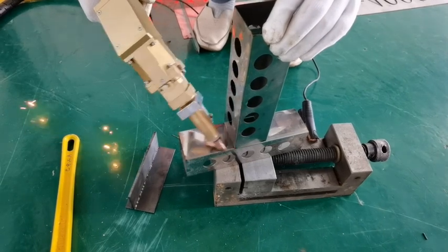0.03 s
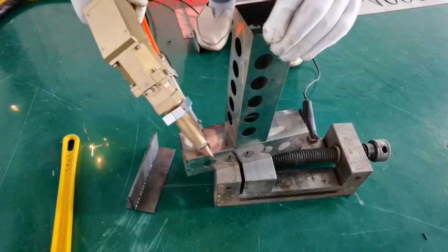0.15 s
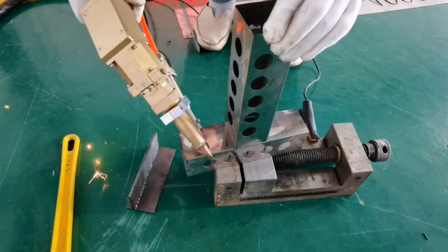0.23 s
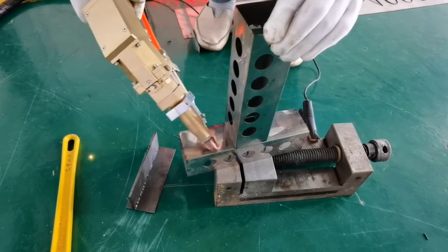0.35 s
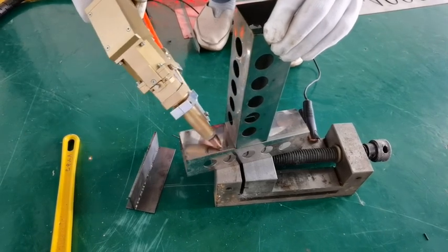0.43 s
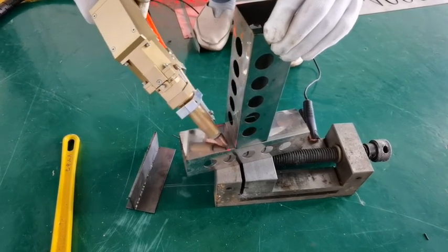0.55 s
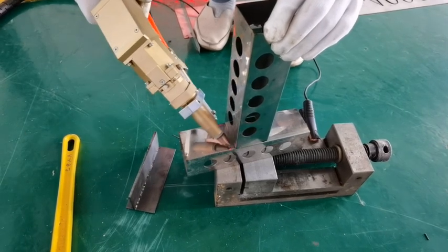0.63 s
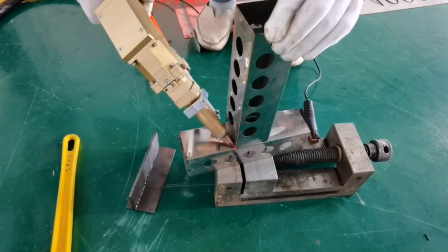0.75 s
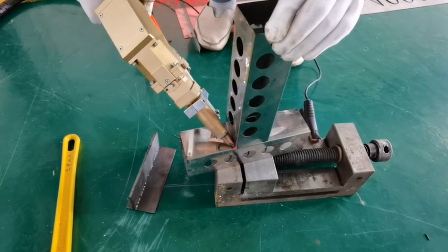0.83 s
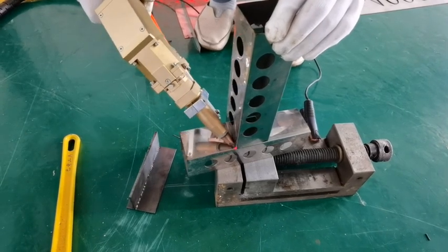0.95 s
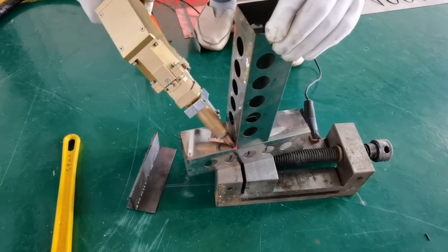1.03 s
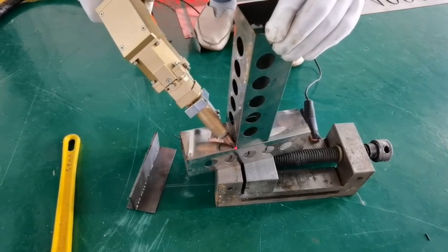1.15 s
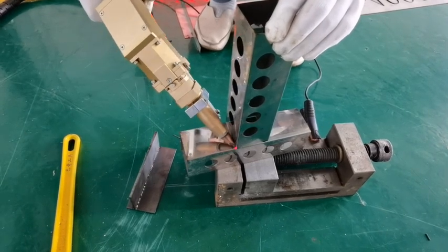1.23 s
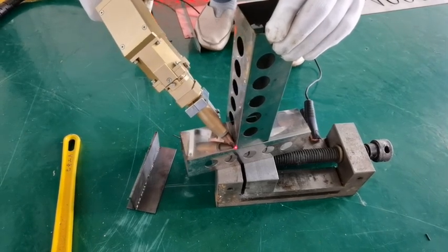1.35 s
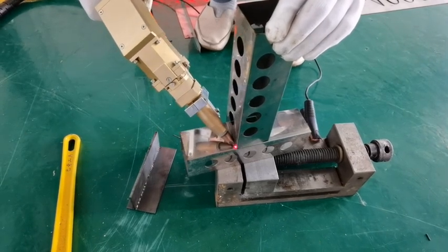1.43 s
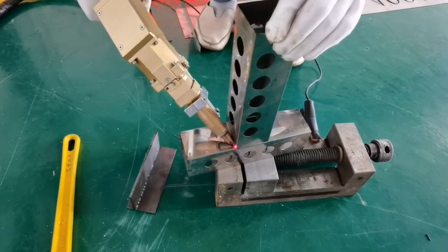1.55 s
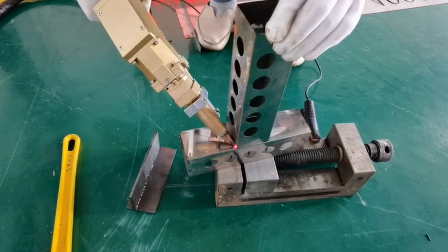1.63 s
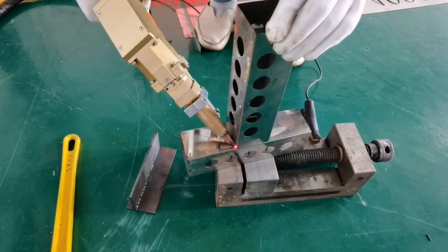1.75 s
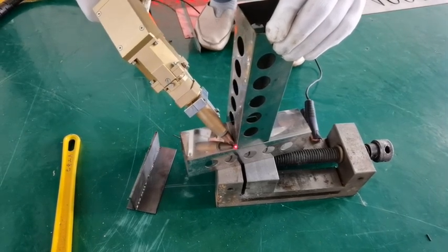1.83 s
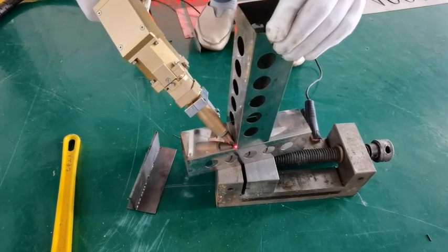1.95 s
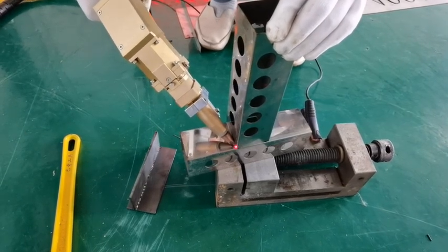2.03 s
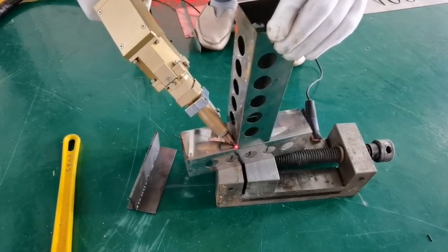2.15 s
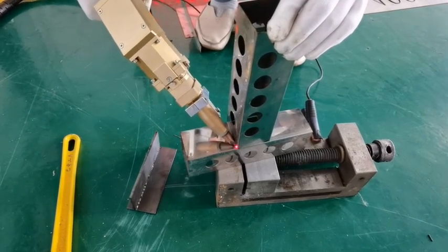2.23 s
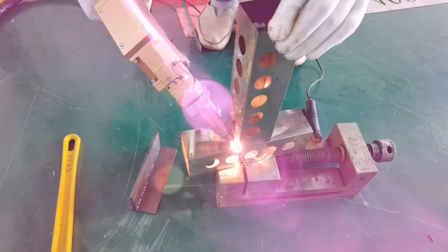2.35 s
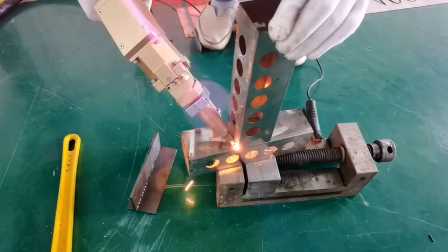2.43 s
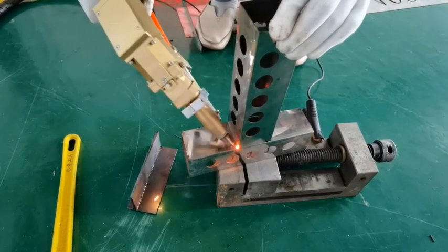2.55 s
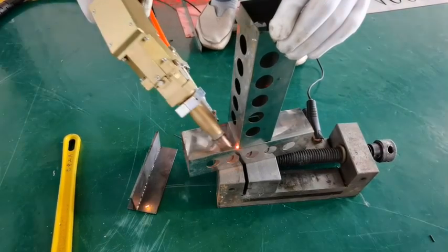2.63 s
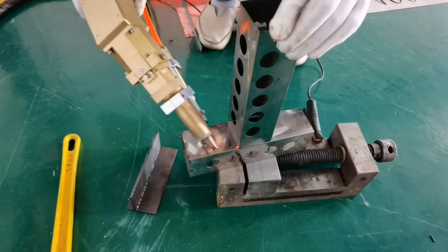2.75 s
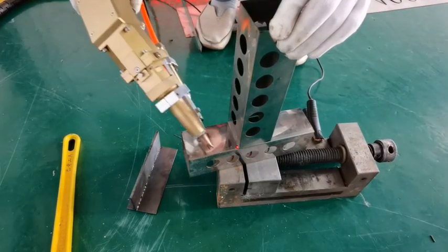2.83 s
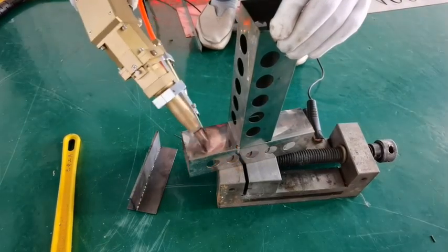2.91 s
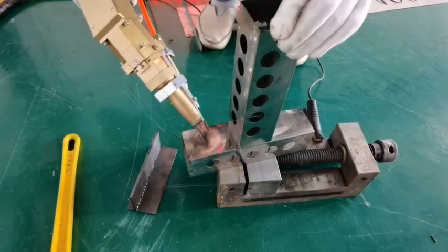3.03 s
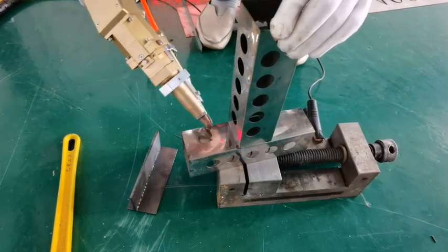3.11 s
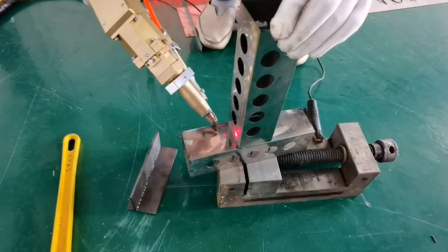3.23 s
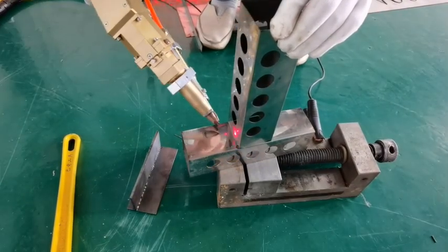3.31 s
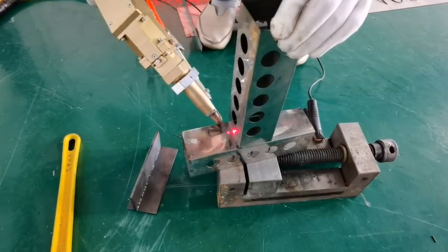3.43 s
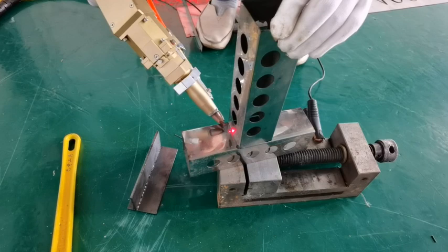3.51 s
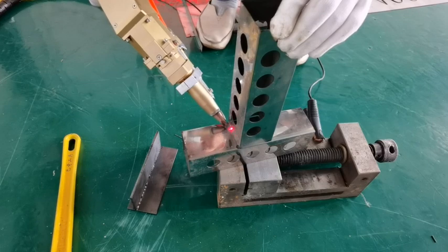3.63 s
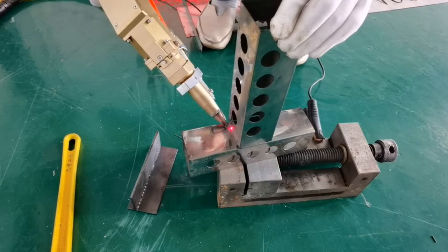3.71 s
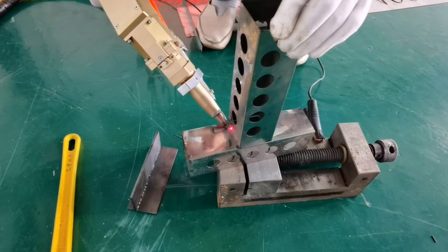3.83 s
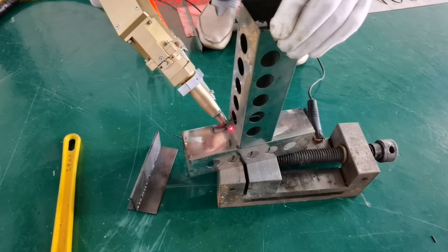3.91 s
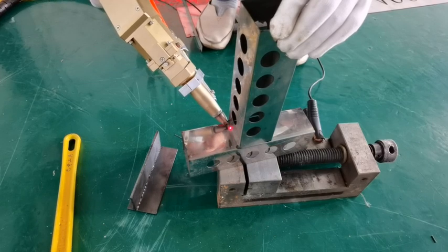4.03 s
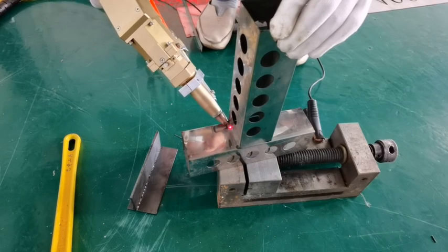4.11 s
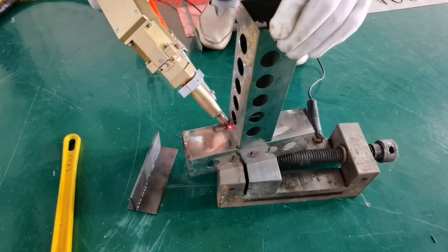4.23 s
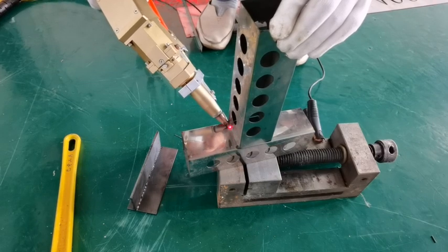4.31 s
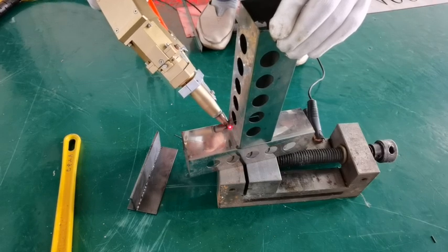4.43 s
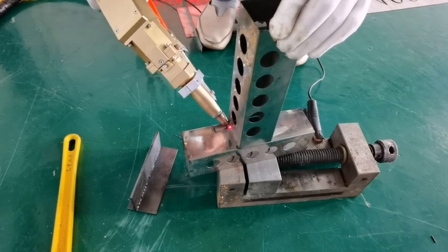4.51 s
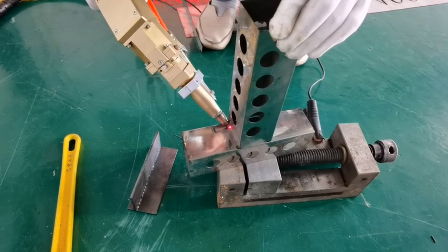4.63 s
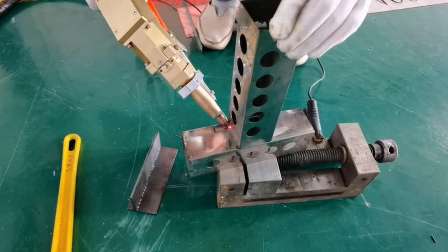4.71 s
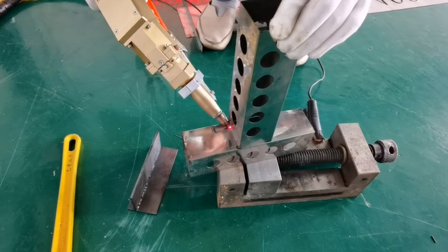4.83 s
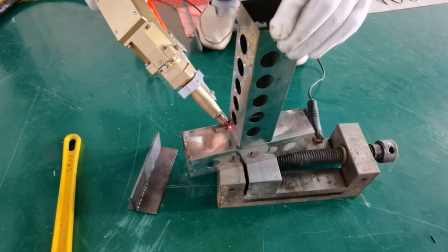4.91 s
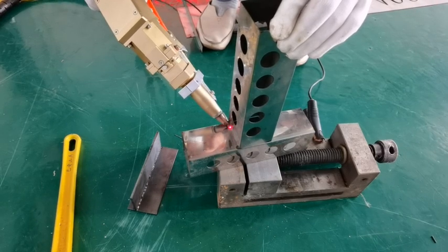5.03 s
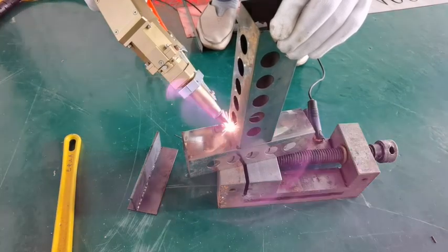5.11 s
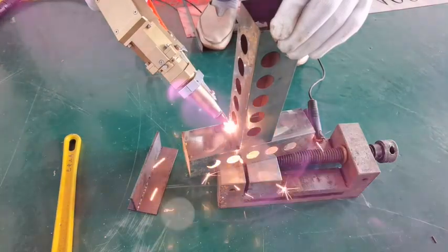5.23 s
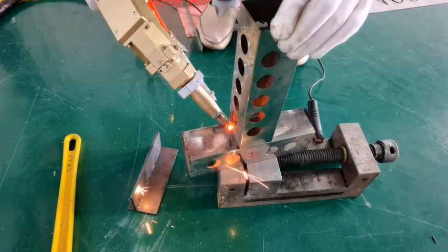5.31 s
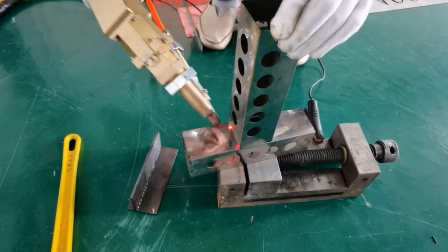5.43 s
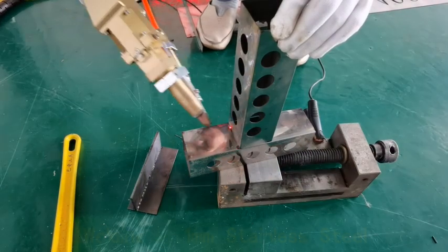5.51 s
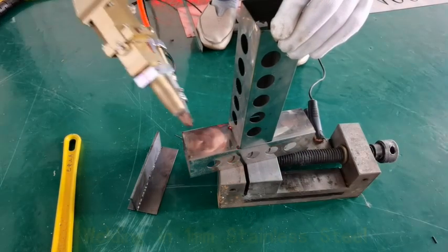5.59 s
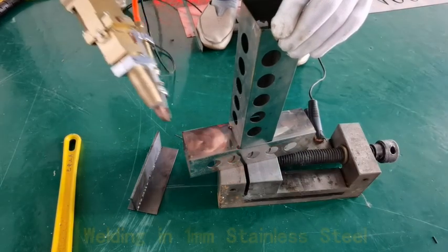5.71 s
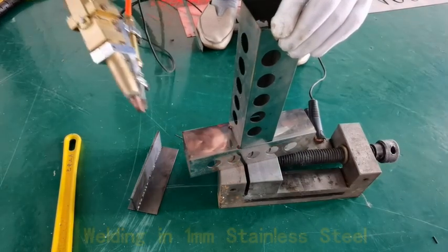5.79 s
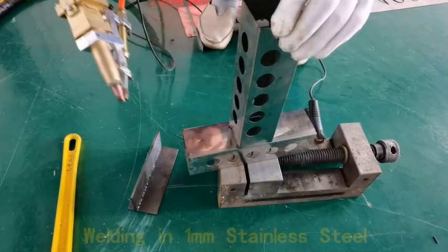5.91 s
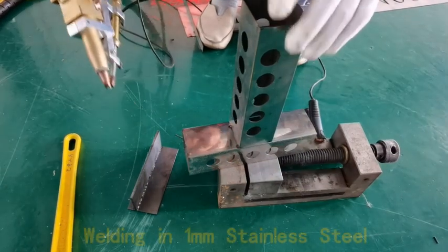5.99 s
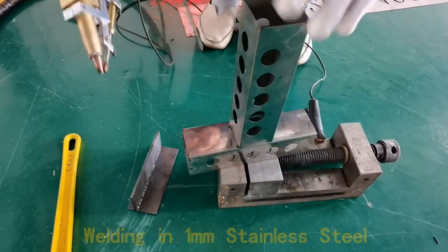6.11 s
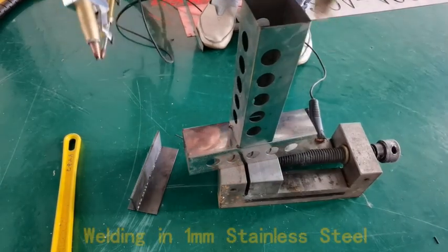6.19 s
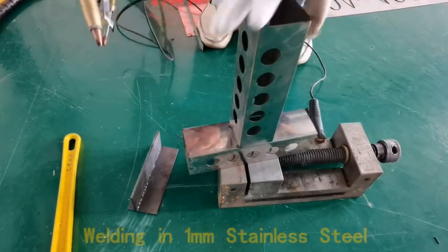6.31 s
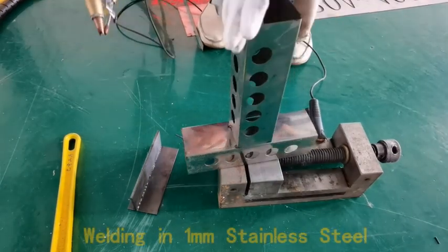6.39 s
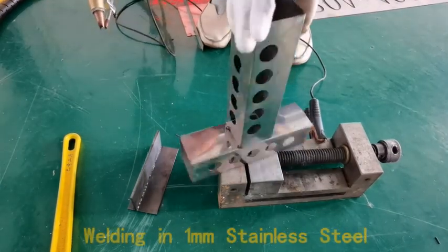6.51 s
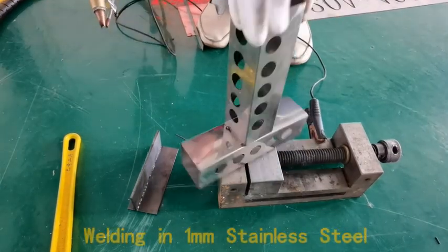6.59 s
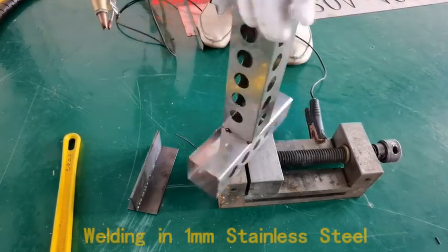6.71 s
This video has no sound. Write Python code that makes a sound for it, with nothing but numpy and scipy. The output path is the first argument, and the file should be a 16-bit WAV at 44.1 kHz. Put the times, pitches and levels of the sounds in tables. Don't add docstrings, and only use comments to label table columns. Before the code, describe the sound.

A workshop hums steadily from the start: low chiller rumble, wavering pump and fan tones, smooth bright gas hiss and a faint, very thin electronic whine. At about 2.27 seconds a gas nozzle whistles, then at 2.31 a sharp snap starts a harsh burst, buzzing about 53 times a second with crackling spits and high shrieks, stopping near 2.47. A short whistling gas tail closes by about 2.6. The room dips during the burst and stays slightly quieter. Hum and hiss continue until a second whistle around 5.14 and a similar rasping burst from 5.16 to 5.33, with a quick gas cutoff. The background is lower again. From about 6.48 to 6.75, a thin steel tube scrapes off a vice in quick stuttering rubs, with squeals near two kilohertz and hollow low rings. Close stereo microphone, little reverberation.

```python
import sys
import numpy as np
from scipy import signal
from scipy.fft import rfft, irfft, next_fast_len
from scipy.io import wavfile
from scipy.ndimage import uniform_filter1d

SR = 44100
rng = np.random.default_rng(int(sys.argv[2]) if len(sys.argv) > 2 else 0)


def store_wav(level_fs):
    pcm = np.round(np.clip(np.atleast_2d(level_fs), -1, 1) * 32767)
    wavfile.write(sys.argv[1], SR, pcm.T.astype(np.int16))


def field_ratio(decibels):
    return 10 ** (np.asarray(decibels, dtype=float) / 20)


N = 297719
BETWEEN_TACKS_S = 4


def weld():
    first, second = [port_noise(ports, ridges, echo=0.27) for ports, ridges in zip(JET_PORTS, JET_RIDGES)]
    jet = np.where(np.arange(N) / SR < BETWEEN_TACKS_S, first, second)
    puffs = vapour_puffs(jet)
    return opposed(puffs + gas_flow(first, second) + spits(jet))


# hz, likeness_0_1, left_lead_rad
JET_PORTS = [
    [(1500, .97, .25), (2250, .8, 1.1), (2600, .7, 1.9), (3100, .6, 1.6), (3400, .7, 1.9), (3750, .8, .6),
     (4250, .85, .5), (4480, .99, .05), (4800, .85, .8), (5400, .8, 1.55), (6150, .7, 2.2),
     (6750, .75, 1.45), (7800, .9, 2.8), (8400, .8, 3.8), (9050, .75, 5.1), (9850, .8, 3.8),
     (10450, .6, 4.7), (10850, .8, 3.7), (11200, .7, 5.1), (11600, .8, 3.7), (12230, .7, 5.2),
     (12600, .8, 8.3), (13300, .98, 9.4), (14200, .3, 12.0), (15000, .5, 14.1), (15700, .98, 15.7)],
    [(1900, .85, .7), (2300, .85, 1.6), (2550, .9, 2.3), (2720, .997, 3.1), (2900, .997, 3.17),
     (3080, .7, .4), (4000, .75, .8), (4400, .75, 1.5), (5600, .8, 1.7), (6350, .9, 2.6), (7050, .85, 2.3),
     (7350, .997, 3.1), (7950, .997, 3.17), (8450, .85, 5.1), (9000, .85, 5.7), (9500, .8, 5.1),
     (10150, .93, 3.5), (10800, .8, 5.0), (11500, .7, 4.8), (12050, .9, 3.5), (12700, .7, 3.8),
     (14300, .8, 3.8), (15000, .5, 5.1), (15600, .4, 4.6)],
]
# hz, width_hz, level_db
JET_RIDGES = [
    [(1960, 180, -6.5), (2760, 140, 8), (4290, 150, 5), (4760, 230, -4), (5450, 280, 0.5), (6200, 230, -10),
     (7230, 220, -5.5), (8000, 200, 2), (8300, 200, -1), (8750, 170, -2), (3340, 230, 1.5),
     (7240, 150, 1.5), (10050, 150, 0), (10400, 100, -12), (11300, 150, 3), (11700, 120, -3),
     (13200, 90, -8), (13650, 180, 5), (14830, 200, -4), (10900, 200, 2), (11700, 350, 4), (12400, 160, -1),
     (14000, 300, -3), (15500, 300, 6)],
    [(1960, 190, -13), (2500, 390, 1.5), (2820, 190, 1), (3900, 460, 3), (4300, 130, -3.5), (5470, 240, -4),
     (6400, 200, -1), (7000, 300, 3), (8160, 370, -4), (9100, 240, -1), (10250, 240, 7), (10800, 200, -4),
     (12800, 300, -4), (9800, 110, -8), (11000, 120, -5), (11450, 180, 5), (12050, 150, 3),
     (13100, 170, 11), (13400, 100, -5), (14400, 120, -4), (15000, 200, -7), (15500, 200, 1)],
]


def port_noise(ports, ridges=(), echo=0):
    size = next_fast_len(N)
    hz = np.arange(size // 2 + 1) * SR / size
    points_hz, likeness, lead_rad = np.transpose(ports)
    alike = np.clip(np.interp(hz, points_hz, likeness), 0, 1)
    lead = np.interp(hz, points_hz, lead_rad)
    shared, left, right = rfft(rng.standard_normal((3, size)))
    turn = np.exp(0.5j * lead)
    pair = np.sqrt(alike) * shared * [turn, 1 / turn] + np.sqrt(1 - alike) * np.array([left, right])
    colour = field_ratio(sum(db * np.exp(-((hz - centre) / width) ** 2) for centre, width, db in ridges))
    lags_s = rng.uniform(0.001, 0.012, size=6)
    comb = 1 + echo * sum(np.exp(-2j * np.pi * hz * lag) for lag in lags_s)
    return irfft(pair * colour * comb, size)[:, :N]


# peak_s, level_db, low_over_rest_db
SWEEPS = [
    [(2.310, -0.5, 0.5), (2.3285, 2, -3), (2.351, 1.5, -1), (2.369, 0, -3), (2.390, -2, 1),
     (2.410, -0.5, -3), (2.430, -0.5, -3), (2.447, -0.5, -4), (2.460, -2.5, -3)],
    [(5.167, 2.5, 0), (5.186, 1, -1), (5.205, 3.5, -5.5), (5.224, 1.5, -3.5), (5.243, -3, 0.5),
     (5.260, 0, -1), (5.279, -5.5, 0.5), (5.298, -3, 1.5), (5.317, -1, -1.5)],
]
# first_db, turn_db, last_db, turn_share_of_tack
NOZZLE_LAW, UPPER_LAW, LOWER_LAW = (-20, -16.5, -21.5, -1), (-25.5, -15.5, -17.5, 0.53), (-29, -16, -17.5, 1.03)
# first_s, turn_s, last_s, turn_share_of_tack
PUFF_LAW = (0.0059, 0.0099, 0.0055, 0.38)
PUFF_STRETCH = (1.12, 0.97)


def sweep_power():
    t, power = np.arange(N) / SR, np.zeros((3, N))
    for tack, stretch in zip(SWEEPS, PUFF_STRETCH):
        for k, (peak_s, level_db, low_db) in enumerate(tack):
            share = k / (len(tack) - 1)
            tilt_db = np.array([0, low_db / 2, low_db])
            depth_db = np.array([along(law, share) for law in (NOZZLE_LAW, UPPER_LAW, LOWER_LAW)])
            levels_db = level_db + tilt_db + depth_db
            near = slice(int((peak_s - 0.04) * SR), int((peak_s + 0.04) * SR))
            since_s = t[near] - peak_s
            spread_s = np.where(since_s < 0, 0.65, 1.05) * stretch * along(PUFF_LAW, share)
            power[:, near] += field_ratio(2 * levels_db)[:, None] * np.exp(-(since_s / spread_s) ** 2)
    return power


def along(law, share):
    first, turned, last, turn = law
    return np.interp(share, [0, turn, 1], [first, turned, last])


# hz, level_db_per_hz
NOZZLE = [(8800, -22), (9700, -5), (10300, -0.5), (11000, -3), (11800, -7), (12600, -1), (13100, -17),
          (13900, -11), (14600, -11), (15400, -12), (15700, -22)]
UPPER_JET = [(5300, -13), (6100, -12), (6600, 0), (7500, -3), (8000, 1), (9000, -6), (9800, -10)]
LOWER_JET = [(400, -19), (900, -25), (1200, -10), (2000, -0.5), (2600, 2), (3100, -1), (4200, 1),
             (4800, 3.5), (5600, 2.5), (6400, -8)]
BEAM_OFF_S, SNUFF_DB_PER_S = (2.4705, 5.327), 3000


def vapour_puffs(jet):
    t, power = np.arange(N) / SR, sweep_power()
    sputter = field_ratio(1.3 * drift(590.0))
    puffs = 0
    for part_power, spectrum in zip(power, (NOZZLE, UPPER_JET, LOWER_JET)):
        puffs = puffs + np.sqrt(part_power) * evened(coloured(jet, spectrum), span_s=0.003)
    off_s = np.where(t < BETWEEN_TACKS_S, *BEAM_OFF_S)
    return sputter * puffs * field_ratio(-SNUFF_DB_PER_S * np.clip(t - off_s, 0, 0.05))


# hz, width_hz, level_db
FLOW_TONES = [(9750, 300, -12), (10700, 250, -5), (11000, 300, 0), (11650, 350, -7), (12600, 300, -15),
              (13950, 450, -15), (14850, 350, -13)]
LATE_FLOW_TONES = [(9750, 270, -11), (10400, 300, -10), (10840, 300, 0), (11300, 450, -6),
                   (12500, 300, -15), (13950, 300, -11), (14800, 350, -12)]
# hz, width_hz, level_db
RUSH_TONES = [(1240, 400, 1), (1840, 730, 7.5), (2200, 130, 6), (3230, 840, 11.5), (4200, 300, 13)]
LATE_RUSH_TONES = [(1250, 330, 5.4), (1840, 440, 7.9), (2200, 130, 3), (3350, 400, 11), (4260, 400, 7)]
# peak_s, level_db, length_s
FLARES = [
    (2.295, 2, .01),
    (2.485, -2, .012),
    (2.507, 3, .005),
    (5.337, 0, .004),
    (5.36, -2, .008),
]


def gas_flow(first, second):
    whistle_db, rush_db = flow_levels()
    whistle_gain = field_ratio(whistle_db + 1.1 * drift(45.0) + bumps(FLARES))
    whistle = whistle_gain * each_tack(first, second, FLOW_TONES, LATE_FLOW_TONES)
    rush_gain = field_ratio(rush_db + 1.5 * drift(40.0))
    late_noise = np.roll(first, SR, axis=1)
    return whistle + rush_gain * each_tack(first, late_noise, RUSH_TONES, LATE_RUSH_TONES)


# open_s, shut_s, whistle_db, closing_db_per_s, bleed_under_whistle_db
VALVE = [
    (2.27, 2.543, -29, 700, -6),
    (5.144, 5.348, -28, 212, -24),
]
CLIMB_DB_PER_S, OPENING_DB_PER_S, BLEED_DB_PER_S = 20, 350, 163
# peak_s, level_db, fade_s
GUSTS = [
    (2.245, -44.5, 0.023),
    (2.295, -36.5, 0.028),
    (2.478, -42, 0.14),
    (5.10, -43, 0.038),
    (5.336, -45, .083),
]
GUST_RISE_S, RUSH_UNDER_WHISTLE_DB = 0.02, -21


def flow_levels():
    t, levels = np.arange(N) / SR, []
    for open_s, shut_s, level_db, closing, bleed_db in VALVE:
        top_db = level_db + CLIMB_DB_PER_S * (np.clip(t, open_s, shut_s) - open_s)
        levels.append(swell(open_s, shut_s, top_db, OPENING_DB_PER_S, closing))
        levels.append(swell(shut_s, shut_s, top_db + bleed_db, OPENING_DB_PER_S, BLEED_DB_PER_S))
    whistle_db = np.max(levels, axis=0)
    rush_levels = [whistle_db + RUSH_UNDER_WHISTLE_DB]
    for peak_s, level_db, fade_s in GUSTS:
        length_s = np.where(t < peak_s, GUST_RISE_S, fade_s)
        rush_levels.append(level_db - 8.7 * ((t - peak_s) / length_s) ** 2)
    return whistle_db, np.max(rush_levels, axis=0)


def each_tack(early, late, tones, late_tones):
    half = BETWEEN_TACKS_S * SR
    before = rms_one(resonant(early[:, :half], tones))
    after = rms_one(resonant(late[:, half:], late_tones))
    return np.hstack([before, after])


# peak_s, level_db, centre_hz, length_s
SPITS = [(2.34, -31, 4300, .004), (2.354, -36, 5300, 0.0036), (2.37, -30, 6700, .003),
         (2.374, -24, 4200, .0016), (2.393, -22, 4000, 0.0026), (2.394, -24, 5500, .0022),
         (2.41, -25, 5600, .0022), (2.423, -35, 4300, .003), (2.441, -28, 4450, .003),
         (2.451, -21, 4300, 0.0018), (2.459, -15, 5070, 0.0015), (2.46, -34, 1440, 0.0046),
         (2.436, -32, 1490, 0.0036), (5.21, -27, 4300, .003), (5.218, -28, 3730, .0022),
         (5.219, -34, 1560, 0.0036), (5.25, -20, 5200, .0022), (5.257, -28, 3800, .0025),
         (5.257, -36, 1250, .003), (5.278, -16.5, 3900, 0.0021), (5.279, -29, 1530, .0022),
         (5.297, -20, 3700, .0022), (5.298, -23.5, 2200, 0.0036), (5.316, -22.5, 3740, 0.0019),
         (5.32, -29, 1830, 0.0028), (5.302, -31, 2350, 0.0046), (5.311, -33, 2200, .004),
         (5.318, -27, 2320, 0.0023), (2.31, -33, 1800, 0.0022), (2.316, -36, 2200, .003),
         (2.303, -39, 1700, .003)]
# peak_s, level_db, centre_hz, length_s
SHRIEKS = [(2.311, -16, 11600, .0025), (2.330, -13, 11400, .003), (2.354, -21, 11800, .004),
           (2.368, -20, 11200, .003), (2.393, -20, 11600, .004), (2.412, -18, 11900, .003),
           (5.167, -20, 11200, 0.0027), (5.187, -17, 10600, .003), (5.206, -18, 10600, .004),
           (5.226, -25, 9100, 0.0037), (5.265, -23, 9200, .004), (5.298, -21, 10600, .003),
           (5.316, -19, 10000, .003)]
SPIT_HALF_WIDTH, SHRIEK_HALF_WIDTH = 0.18, 0.083


def spits(jet):
    t, out = np.arange(N) / SR, np.zeros((2, N))
    for rows, half_width in ((SPITS, SPIT_HALF_WIDTH), (SHRIEKS, SHRIEK_HALF_WIDTH)):
        for peak_s, level_db, hz, length_s in rows:
            near = slice(int((peak_s - 0.03) * SR), int((peak_s + 0.03) * SR))
            edges_hz = [hz * (1 - half_width), hz * (1 + half_width)]
            band_pass = signal.butter(2, edges_hz, "band", fs=SR, output="sos")
            shape = np.exp(-((t[near] - peak_s) / length_s) ** 2)
            burst = shape * signal.sosfilt(band_pass, jet[:, near])
            out[:, near] += field_ratio(level_db) * burst / np.sqrt(np.mean(burst ** 2) / np.mean(shape ** 2))
    return out


# low_hz, high_hz
NULLS = [
    [(3020, 3100), (4980, 5060), (6170, 6330), (10260, 10400), (13170, 13450)],
    [(1960, 2040), (2690, 2870), (7560, 7960), (12740, 12820), (13390, 13470), (14330, 14450),
     (15050, 15180)],
]


def opposed(pair):
    middle = pair.mean(axis=0)
    kept = []
    for half, nulls in zip(np.split(middle, [BETWEEN_TACKS_S * SR]), NULLS):
        notches = [signal.butter(2, band, "bandstop", fs=SR, output="sos") for band in nulls]
        kept.append(signal.sosfilt(np.vstack(notches), half + 1e-18))
    return pair - middle + np.hstack(kept)


# start_s, peak_db, centre_hz
IGNITION = [
    (2.3082, -17, 3800),
    (2.3082, -29, 1300),
    (5.1625, -26, 4000),
    (5.163, -31, 1300),
]


def ignition():
    t, out = np.arange(N) / SR, 0
    for start_s, peak_db, hz in IGNITION:
        shape = np.exp(-((t - start_s) * hz / 1.3) ** 2)
        out = out + field_ratio(peak_db) * shape * np.sin(2 * np.pi * hz * (t - start_s))
    return out


# hz, width_hz, level_db
TUBE_LOW = [(503, 20, 0), (690, 25, -24)]
TUBE_SCRAPED = [(1430, 40, -10), (1590, 35, -3), (1680, 35, -4), (1840, 40, 0), (2000, 40, -4),
                (2620, 50, -20)]
TUBE_SINGING = [(1932, 16, 0)]
TUBE_LOW_TWIN = [(530, 20, 0)]
TUBE_HIGH = [(2365, 20, 0)]
TUBE_TAIL = [(1800, 25, 0)]
# full_s, release_s, level_db, rise_db_per_s, fall_db_per_s
LOW_RING = [
    (6.485, 6.5, -57, 400, 200),
    (6.52, 6.535, -43, 600, 350),
    (6.555, 6.585, -46, 300, 300),
    (6.603, 6.61, -40.5, 700, 797),
]
SCRAPE = [
    (6.487, 6.495, -44, 900, 300),
    (6.528, 6.538, -43, 500, 600),
    (6.562, 6.57, -46, 900, 400),
]
SINGING = [
    (6.485, 6.5, -44, 900, 200),
    (6.51, 6.525, -47, 400, 500),
    (6.568, 6.6, -40, 700, 350),
    (6.625, 6.645, -49, 300, 200),
    (6.69, 6.72, -58, 200, 150),
]
TWIN_RING = [
    (6.625, 6.635, -46, 400, 200),
    (6.645, 6.66, -40, 500, 353),
    (6.68, 6.69, -49, 300, 300),
    (6.715, 6.74, -42, 600, 300),
]
HIGH_RING = [
    (6.535, 6.57, -48.5, 400, 400),
]
TAIL_RING = [
    (6.695, 6.72, -56, 400, 500),
]
TOUCH_S, GRAINS_PER_S = 6.472, 2500


def drag():
    struck = rng.random(N) < GRAINS_PER_S / SR
    strength = field_ratio(2.1 * rng.exponential(1, N))
    grains = struck * strength * rng.choice([-1, 1], N) + 1e-18
    groups = ((LOW_RING, TUBE_LOW), (SCRAPE, TUBE_SCRAPED), (SINGING, TUBE_SINGING),
              (TWIN_RING, TUBE_LOW_TWIN), (HIGH_RING, TUBE_HIGH), (TAIL_RING, TUBE_TAIL))
    ring = 0
    for rubs, modes in groups:
        level_db = np.max([swell(*rub) for rub in rubs], axis=0)
        ring = ring + field_ratio(level_db) * evened(resonant(grains, modes), span_s=0.03)
    touching = np.clip((np.arange(N) / SR - TOUCH_S) / 0.012, 0, 1)
    return touching * np.array([ring, np.roll(ring, 4)])


# hz, likeness_0_1, left_lead_rad
ROOM_PORTS = [(30, .98, .05), (100, .99, .23), (180, .97, .4), (320, .93, .35), (500, .8, .5),
              (800, .5, 1.3), (1050, .85, 1.75), (1300, .78, 2.5), (1600, .72, 3.1), (2000, .15, 3.5),
              (2600, 0, 3.5)]
# hz, level_db_per_hz
RUMBLE = [(12, -46), (20, -11.5), (54, -5), (107, -2), (139, -9.5), (178, 2.5), (245, -11.5), (284, -7.5),
          (430, -19.5), (864, -24), (1040, -27.5), (1190, -25), (1800, -34.5), (2340, -66), (3960, -120)]
RUMBLE_DB = -35.0
# hz, width_hz, level_db
PUMP_TONES = [(93.1, 24.5, -43), (110.6, 22.7, -38.5)]
PUMP_BEAT = [(184, 36, -46)]
FAN_TONE = [(280.2, 11.3, -44)]
FAN_WHIRR = [(347, 13, -58), (405, 120, -73), (488, 56, -56.5), (696, 54, -59.5), (1035.3, 67, -54)]
# peak_s, level_db, length_s
PUMP_LOAD = [(0.0, -7, 0.1), (.52, 7.5, 0.037), (0.9, -5.5, 0.18), (1.402, 0, 0.11), (1.72, 4.5, 0.064),
             (2.3, -8, 0.13), (2.9, 1.5, 0.09), (3.6, 0.5, 0.6), (4.3, 5.5, 0.49), (4.85, 9, 0.022),
             (4.96, -4, .04), (5.58, -4, 0.044), (6.4, -13, 0.1)]
BEAT_LOAD = [(.1, -7, .14), (.5, 0, .08), (1.05, -6, .15), (1.3, 0, .1), (1.72, 6, 0.064), (2.05, -4, .12),
             (2.8, 8, 0.16), (3.1, 1, .1), (3.6, 4, 0.33), (4.3, 4, 0.17), (4.65, 8, 0.13), (5.0, -2, .1),
             (5.55, 7, 0.087), (6.05, -7, .08), (6.4, -12, 0.14)]
FAN_LOAD = [(.5, -0.5, .15), (1.35, 0, 0.11), (1.8, -2.5, 0.11), (2.8, 2, 0.13), (3.9, -4.5, 0.25),
            (4.9, 2, 0.24), (5.1, 6, .06), (5.6, 3.5, 0.099), (6.4, -1, 0.13)]
FAN_SWELLS = [(.22, 1, .06), (1.18, 6.5, 0.11), (1.68, 13, 0.041), (1.82, 4, 0.044), (3.33, 4, 0.054),
              (3.8, 5, 0.048), (3.9, 9.5, 0.027), (4.97, 3, .04), (5.5, -1, 0.053), (.9, 1, .08),
              (2.8, 1, .1), (3.1, 4, .08), (4.05, -4, .04), (4.5, -2.5, 0.17), (5.62, 5, .04),
              (5.72, 2, .03), (5.83, 5, .03), (6.01, 7, .03), (6.17, 7, 0.016), (6.31, 5, .03),
              (6.42, 6, .012), (6.47, 5, .015), (6.71, 10, .02)]


def chiller():
    rumble = field_ratio(RUMBLE_DB) * coloured(port_noise(ROOM_PORTS), RUMBLE)
    air = port_noise(ROOM_PORTS)
    pump = resonant(air, PUMP_TONES) * field_ratio(bumps(PUMP_LOAD))
    beat = resonant(air, PUMP_BEAT) * field_ratio(bumps(BEAT_LOAD))
    fan = resonant(air, FAN_TONE) * field_ratio(bumps(FAN_LOAD))
    whirr = 0
    for tone in FAN_WHIRR:
        swells_db = bumps(FAN_SWELLS) if tone[0] > 1000 else 0
        whirr = whirr + resonant(air, [tone]) * field_ratio(1.2 * drift(2.5) + swells_db)
    return rumble + pump + beat + fan + whirr


# hz, level_db_per_hz
HISS = [(760, -71), (1300, -12.5), (1900, -12.5), (2800, -9), (3800, -5), (4550, -4), (4800, -9),
        (5500, -6), (6330, -1.5), (7480, 0.5), (8480, -3.5), (12500, -3.5), (12900, -8.5), (15800, -5.5)]
HISS_DB = -33


def gas_hiss():
    gain = field_ratio(HISS_DB + 0.53 * drift(12.0) + 0.45 * drift(40.0))
    return gain * coloured(port_noise(ROOM_PORTS), HISS)


# hz, left_over_right_db
ROOM_LEAN = [(10, -.5), (80, -.2), (160, 1.2), (1200, 1.1), (2500, .3), (22050, .1)]


def lean(x):
    size = next_fast_len(N)
    hz = np.arange(size // 2 + 1) * SR / size
    left_db = np.interp(hz, *np.transpose(ROOM_LEAN))
    return irfft(rfft(x, size) * field_ratio(left_db * [[0.5], [-0.5]]), size)[:, :N]


# pitch_hz, on_s, off_s, level_db, fade_db_per_s (off before on: a fainter hold between them)
WHINE = [(14870, 2, .03, -54, 45), (14870, 1.0, 1.35, -55, 33), (14870, 0, 2.6, -52, 30),
         (14870, 1, 3.2, -57.5, 50), (14870, 5.68, 5.4, -52, 202), (15590, 2, .72, -58, 22),
         (15590, 3, 2.9, -57, 40)]


def whine():
    t, out = np.arange(N) / SR, 0
    for hz in (14870, 15590):
        rows = [row for row in WHINE if abs(row[0] - hz) < 350]
        level_db = np.max([swell(on_s, off_s, db, fade, fade) for _, on_s, off_s, db, fade in rows], axis=0)
        phase_rad = [[0], [2.0]]
        out = out + field_ratio(level_db + 4 + 1.5 * drift(8.0)) * np.sin(2 * np.pi * hz * t + phase_rad)
    return out


# beam_on_s, beam_off_s, duck_db, release_s, lasting_loss_db
DUCKS = [
    (2.317, 2.461, -6.5, 0.017, -3.5),
    (5.182, 5.322, -10.5, 0.051, -4),
]
DUCK_ATTACK_S, DUCK_FIRST_SHARE, SETTLE_S, RECOVER_DB_PER_S = 0.0068, 0.99, 0.083, 0.38


def recorder_gain():
    t, gain_db = np.arange(N) / SR, 0
    for on_s, off_s, duck_db, release_s, loss_db in DUCKS:
        free_s = off_s + release_s
        times_s = [on_s - DUCK_ATTACK_S, on_s, off_s, free_s, free_s + SETTLE_S]
        gain_db = gain_db + np.interp(t, times_s, [0, DUCK_FIRST_SHARE * duck_db, duck_db, 0, loss_db])
        gain_db = gain_db + RECOVER_DB_PER_S * np.maximum(t - off_s, 0)
    return field_ratio(gain_db)


def rms_one(x):
    return x / np.sqrt(np.mean(x ** 2) + 1e-20)


def drift(rate_hz):
    r = np.exp(-2 * np.pi * rate_hz / SR)
    noise = rng.standard_normal(N + SR)
    return rms_one(signal.lfilter([1], [1, -2 * r, r * r], noise)[SR:])


def coloured(x, spectrum):
    size = next_fast_len(N)
    log_hz = np.log(np.arange(size // 2 + 1) * SR / size + 1)
    points_hz, level_db = np.transpose(spectrum)
    gain = field_ratio(np.interp(log_hz, np.log(points_hz), level_db, left=-90, right=-90))
    return rms_one(irfft(rfft(x, size) * gain, size)[..., :N])


def resonant(x, tones):
    out = 0
    for hz, width_hz, level_db in tones:
        r = np.exp(-np.pi * width_hz / SR)
        section = [1, 0, -1, 1, -2 * r * np.cos(2 * np.pi * hz / SR), r * r]
        out = out + field_ratio(level_db) * rms_one(signal.sosfilt([section, section], x))
    return out


def evened(x, span_s):
    power = uniform_filter1d(np.atleast_2d(x ** 2).mean(axis=0), int(span_s * SR))
    return rms_one(x / np.sqrt(power + 0.045))


def swell(on_s, off_s, level_db, rise, fall):
    t = np.arange(N) / SR
    return level_db - rise * np.maximum(on_s - t, 0) - fall * np.maximum(t - off_s, 0)


def bumps(rows):
    t = np.arange(0, N + 32, 32) / SR
    total_db = sum(db * np.exp(-((t - peak_s) / length_s) ** 2) for peak_s, db, length_s in rows)
    return np.interp(np.arange(N) / SR, t, total_db)


def scene():
    room = (lean(chiller() + gas_hiss()) + whine()) * recorder_gain()
    return weld() + ignition() + drag() + room


def band_limit(x):
    return signal.sosfilt(signal.butter(12, 15860, fs=SR, output="sos"), x)


def record(dry):
    rounded = 0.92 * np.tanh(dry / 0.86)
    top_cut = signal.ellip(10, 0.2, 60, 15850, fs=SR, output="sos")
    return band_limit(signal.sosfilt(top_cut, rounded))


dry = scene()
out = record(dry)
store_wav(out)
```